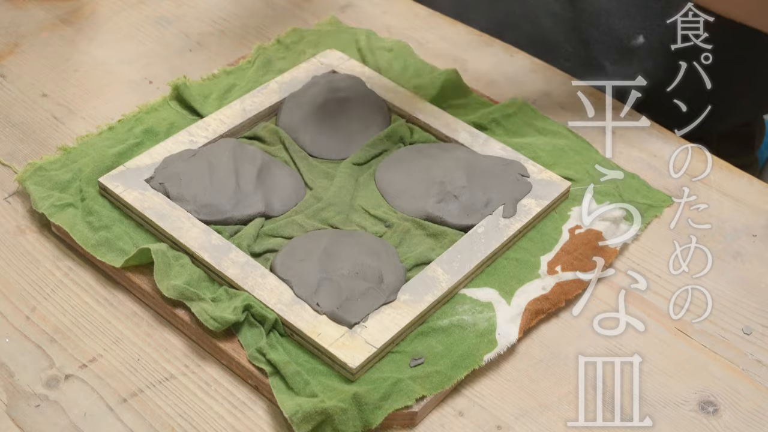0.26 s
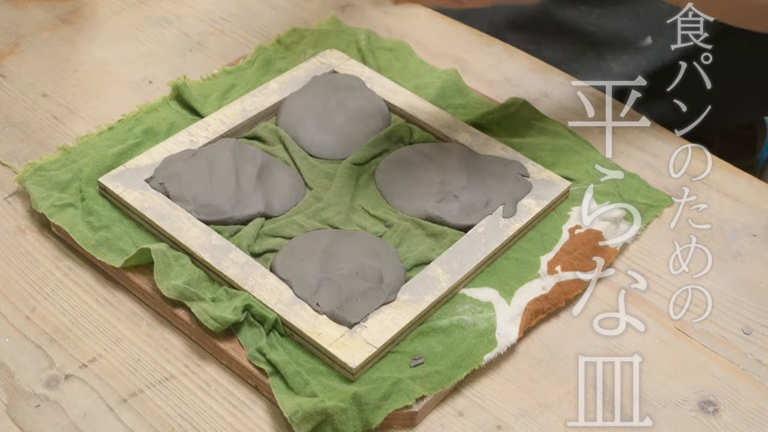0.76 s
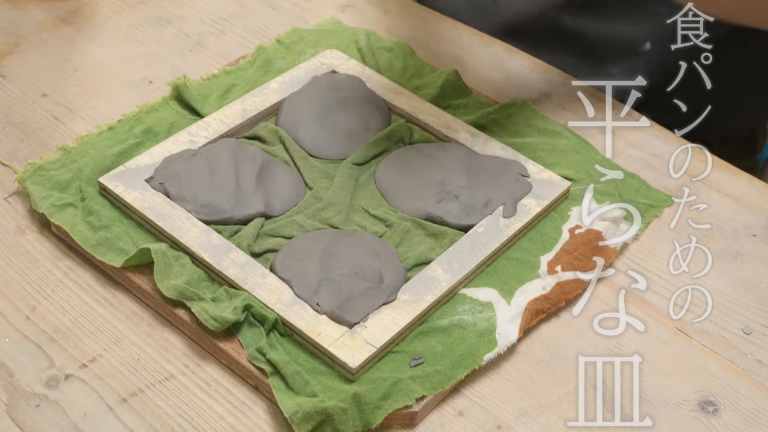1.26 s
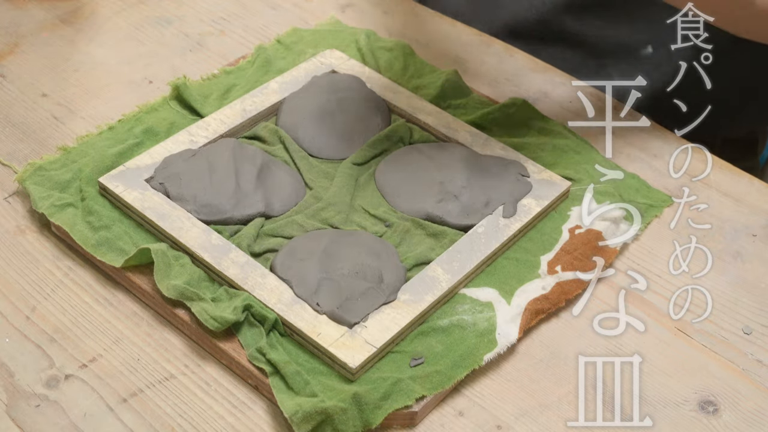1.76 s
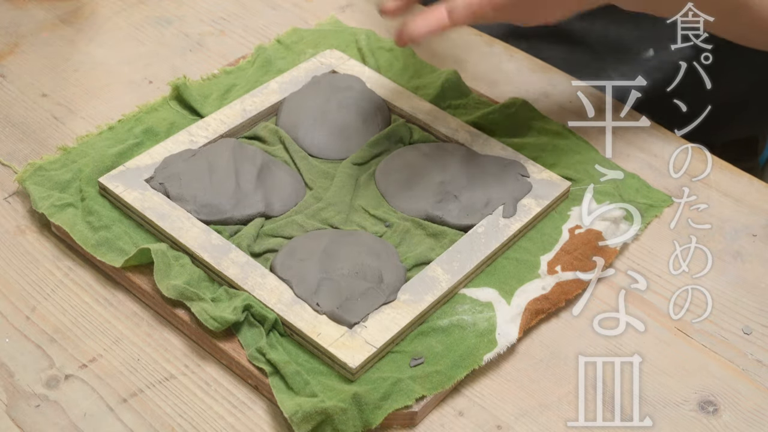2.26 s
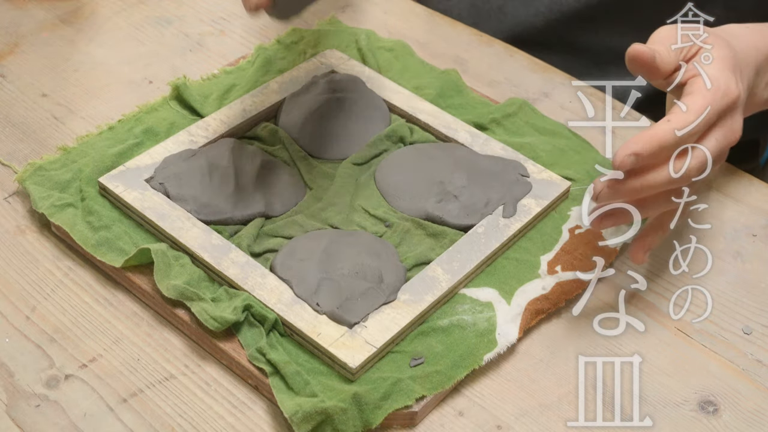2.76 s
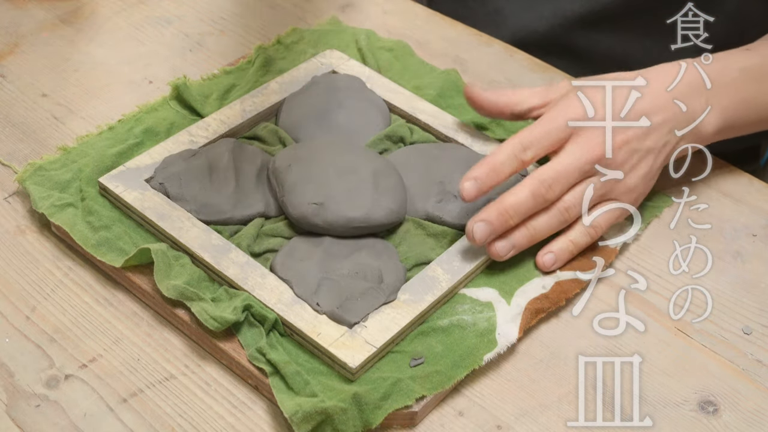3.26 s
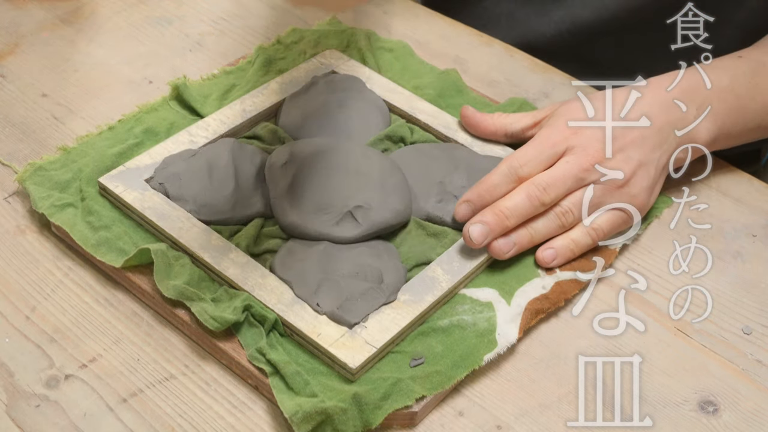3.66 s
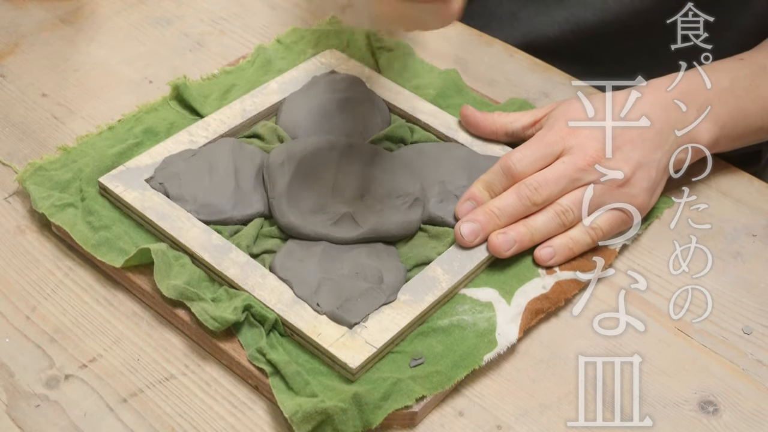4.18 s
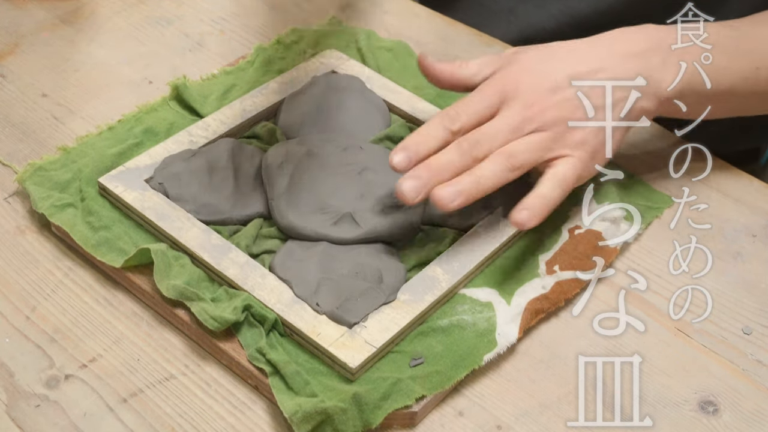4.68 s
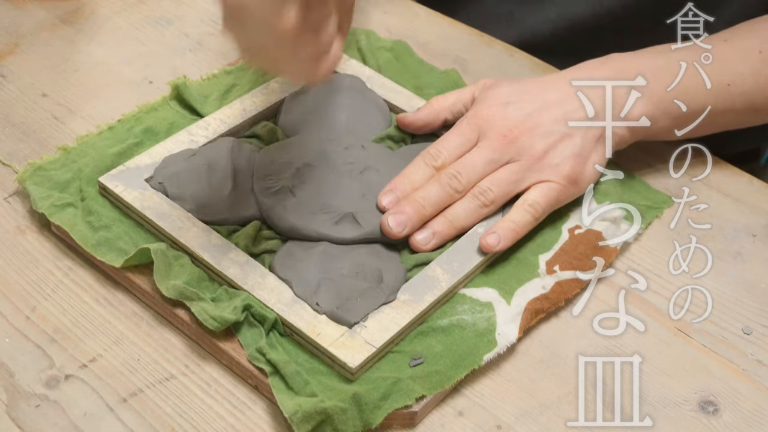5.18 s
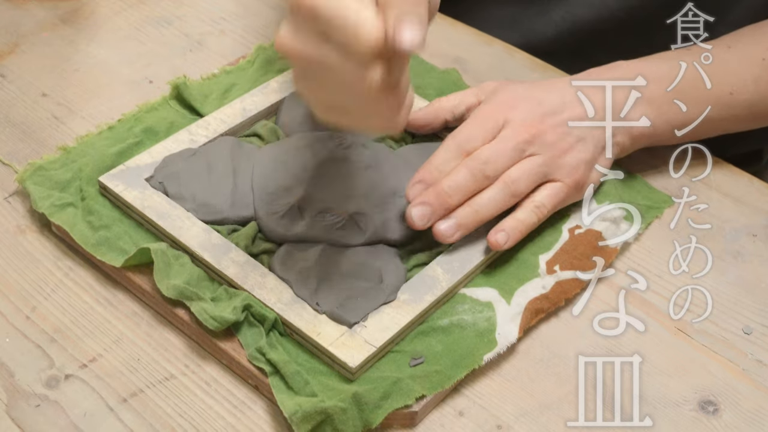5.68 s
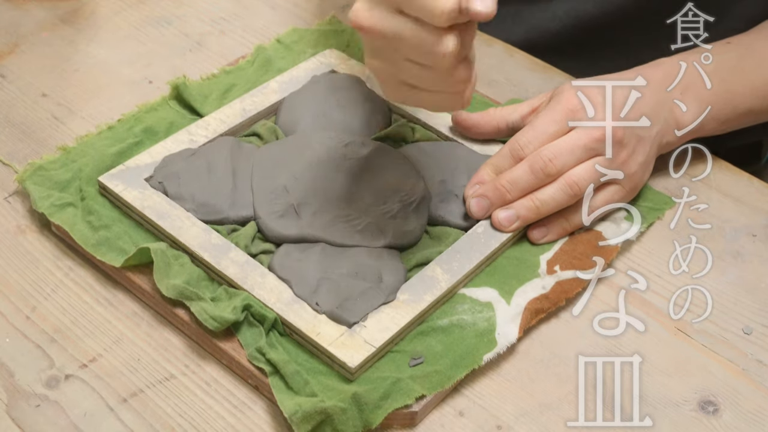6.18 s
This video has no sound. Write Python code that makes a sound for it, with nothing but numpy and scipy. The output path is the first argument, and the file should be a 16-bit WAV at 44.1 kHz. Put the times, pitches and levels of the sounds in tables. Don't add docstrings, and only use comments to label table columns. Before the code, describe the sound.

Crisp clay claps in a small dry workshop, a short pause, then low knocking fist blows making the table boom and loose tools tick.

```python
import sys
import numpy as np
from scipy import signal
from scipy.fft import rfft, irfft
from scipy.io import wavfile

SR = 44100
rng = np.random.default_rng(int(sys.argv[2]) if len(sys.argv) > 2 else 0)


def put_to_file(sound):
    columns = np.atleast_2d(sound).T
    safe = np.clip(columns, -1, 1)
    whole_steps = np.round(safe * 32767)
    wavfile.write(sys.argv[1], SR, whole_steps.astype(np.int16))


def gain_from_decibels(decibels):
    exponent = np.asarray(decibels, float) / 20
    return 10 ** exponent


N = 283563

# (frequency [Hz], level [dB per Hz])
BACKGROUND_SPECTRUM = [(15, -42), (25, -25), (102, 1), (180, -8), (223, -8), (335, -8), (439, -17.5),
                       (591, -21), (658, -22.5), (734, -17.5), (1130, -28.5), (5720, -35), (6550, -34),
                       (12500, -39), (16000, -37.5)]
# (time [s], peak level [dB], air pocket frequency [Hz], hiss level [dB], hiss frequency [Hz])
PALM_SLAPS = [(0.1051, -8.5, 1608, -9, 6800), (0.1097, -0.5, 1950, -21, 3100),
              (0.365, 10, 3363, -9.5, 7300), (0.596, 6, 2004, -4, 4336), (0.808, 0.5, 2070, -7, 6710),
              (0.8125, 5.4, 2168, -9.5, 7000), (1.0202, 13, 2322, -7, 6730), (1.2283, 9, 2150, -12.5, 6060),
              (1.4569, 12.5, 1683, -7, 5150), (1.6753, 12.5, 2400, -2, 6490), (1.9176, 21.5, 2300, 0, 5035),
              (2.1444, 12.5, 3300, 1, 8075)]
# (frequency [Hz], t60 [s])
ROOM_T60 = [(60, 0.12), (250, 0.14), (700, 0.14), (1800, 0.14), (5000, 0.15), (12000, 0.13)]
# (frequency [Hz], level [dB])
ROOM_LEVEL = [(60, -24), (230, -0.5), (420, -0.5), (760, 2.06), (1080, -5), (1800, -2.5), (4000, -2),
              (12000, -1)]
# (time [s], length [s], centre frequency [Hz], level [dB])
PEELS = [
    (0.213, 0.013, 8300, -47),
    (0.286, 0.025, 7500, -60.5),
    (0.327, .02, 7950, -49.5),
    (.67, 0.022, 9000, -51.5),
    (.75, 0.017, 9000, -55.5),
    (0.98, 0.034, 8000, -56),
    (1.198, 0.009, 8600, -48.5),
    (1.424, 0.023, 7000, -52),
]
# (time [s], peak level [dB], air pocket frequency [Hz], hiss level [dB], hiss frequency [Hz])
FIST_SMACKS = [(2.386, -28, 1780, 6, 6000), (2.3906, -26.5, 2440, -9.5, 5000), (2.9505, 3, 1840, -12, 4280),
               (3.4448, -8, 2400, -2.5, 4000), (3.7709, -16, 2380, -12, 4000),
               (4.0314, -25, 1660, -6, 4300), (4.2803, -10.5, 2094, -6.5, 6000),
               (4.4982, -6, 2250, -8.5, 3600), (4.8035, -34, 2210, -3, 3600), (4.81, -21, 2430, -24, 3600),
               (5.05, -20.5, 2400, 3.5, 4200), (5.3155, -8, 2220, -35.5, 3500),
               (5.5542, -14.5, 3000, -4, 10500), (5.7937, -21.5, 1900, -4.5, 3600),
               (6.0361, -20, 2056, 0, 3600), (6.2698, -22.5, 2000, -7, 3800)]
# (time [s], peak level [dB], ring frequency [Hz])
STRAY_TOUCHES = [
    (2.4299, -25.5, 2480),
    (2.8792, -49, 2226),
    (3.1538, -44, 2960),
    (3.3084, -37.5, 2490),
    (3.5917, -22, 5920),
    (4.7533, -32.5, 3560),
    (4.7586, -46, 5400),
    (4.769, -32, 3480),
    (4.7826, -42, 3540),
    (5.8362, -25.5, 2270),
]
# (delay [s], peak level [dB], ring frequency [Hz])
TOOL_LANDINGS = [
    (0.021, -36, 2420),
    (.047, -30, 1500),
    (.052, -21, 2130),
    (.06, -22, 1740),
    (.075, -27, 3600),
    (0.1104, -23.5, 4820),
]
# (frequency [Hz], level [dB], t60 [s])
LOOSE_MODES = [(1500, -1, .005), (2380, 0, .006), (3610, -1, .006), (4270, -3, .004), (5250, -3, .004),
               (5910, -4, .004), (6980, -7, .003), (9900, -14, .004)]
# (time [s], peak level [dB], table top share [dB], frame share [dB], tool hop level [dB])
BLOWS = [(2.951, -8, 12, -4, -27), (3.446, 4, 3.5, -13, 6), (3.771, 0.7, -28, -52, 0),
         (4.031, -1, -30, -29, -1.5), (4.283, -3, 4.5, -7, -6), (4.496, -1, 3.5, -7.5, -3),
         (4.754, -39.5, 20, -5, -50), (4.783, -49.5, 39, 15.5, -46), (4.808, -6.5, -2, -6, -34),
         (5.055, -1, 4.3, -12, -2.2), (5.313, -1, 3, -6.5, -3.5), (5.5578, -1.6, -10, -30, -2.7),
         (5.795, -1.9, -25, -40, -3.5), (6.036, 2.2, -4, -24.5, 4), (6.269, -2, -25, -25.5, -1.5)]
# (frequency [Hz], level [dB], t60 [s])
LEG_MODES = [(43.3, -10, 0.41), (57.8, -9, 0.077), (75.6, -8, 0.22), (86, -16.5, 0.075)]
TOP_MODES = [(139.2, -11, 0.019), (146.8, -6.5, 0.075), (165.9, -3, 0.19), (242.5, -5, 0.12),
             (270.3, -9, 0.11)]
FRAME_MODES = [(350, 8, 0.118), (386.6, 5.5, 0.088), (478, 16, 0.075), (561, 1.5, 0.069),
               (626, -8.5, 0.072), (679, 2, 0.076), (761, 24.5, 0.027), (837, 3, 0.19), (884, 1, 0.047),
               (933, 11, 0.11)]
# (time [s], peak level [dB])
BOARD_KNOCKS = [(3.4525, 5), (3.778, -14.5), (4.0379, -18), (4.2862, -3), (4.503, 5), (4.8116, -6.5),
                (5.0574, 4), (5.3209, 0), (5.5598, -5.5), (5.800, -22), (6.0395, -16), (6.275, -19.5)]


def unit_rms(x):
    return x / np.sqrt(np.mean(x ** 2) + 1e-20)


def at_hz(points, hz):
    table_hz, values = np.array(points).T
    return np.interp(np.log(hz), np.log(table_hz), values)


def band(x, low_hz, high_hz, order=2):
    edges = [low_hz, min(high_hz, 0.47 * SR)]
    return signal.sosfilt(signal.butter(order, edges, "band", fs=SR, output="sos"), x)


def low_pass(x, edge_hz, order):
    return signal.sosfilt(signal.butter(order, edge_hz, fs=SR, output="sos"), x)


def ring(force, hz, t60):
    radius = gain_from_decibels(-60 / (t60 * SR))
    angle = 2 * np.pi * hz / SR
    return signal.lfilter([0, np.sin(angle)], [1, -2 * radius * np.cos(angle), radius ** 2], force + 1e-18)


def add(out, s, piece):
    i = round(s * SR)
    out[i:i + len(piece)] += piece[:N - i]


def background():
    hz = np.maximum(np.fft.rfftfreq(N, 1 / SR), 1)
    spectrum = rfft(rng.standard_normal(N)) * gain_from_decibels(at_hz(BACKGROUND_SPECTRUM, hz))
    noise = gain_from_decibels(-46) * unit_rms(irfft(spectrum, N))
    waver_db = np.interp(np.arange(N), np.linspace(0, N, 60), rng.normal(0, 1.5, 60))
    swell = np.interp(np.arange(N), np.linspace(0, N, 30), rng.standard_normal(30))
    rumble_db = -57 + 5.5 * swell
    low = low_pass(noise, 1000, order=1)
    lowest = low_pass(noise, 200, order=1)
    hiss = noise - low
    hum = gain_from_decibels(waver_db) * (low - lowest)
    return hiss + hum + gain_from_decibels(rumble_db) * unit_rms(low_pass(lowest, 170, order=2))


def cracks(rows, drive_db, contact_s, width, ragged):
    close, pop = np.zeros(N), np.zeros(N)
    t = np.arange(900) / SR
    squirt = np.minimum(t / 0.00044, 1) * np.exp(-(t / contact_s) ** 2)
    click = 1. * (t == 0)
    noises = rng.standard_normal((len(rows), 2, 900))
    for (s, peak_db, pocket_hz, hiss_db, hiss_hz, thud_db), noise in zip(rows, noises):
        thud = -gain_from_decibels(thud_db) * unit_rms(band(squirt, 360, 2900, order=1))
        burst = ragged * noise * squirt / np.linalg.norm(squirt) + (1 - ragged) * click
        for out, (low, high) in ((close, burst), (pop, (click, click))):
            pocket = unit_rms(band(low, pocket_hz / width, pocket_hz * width, order=1))
            hiss = unit_rms(band(high, hiss_hz / 2.26, hiss_hz * 1.442, order=3))
            add(out, s, gain_from_decibels(peak_db + drive_db) * (pocket + gain_from_decibels(hiss_db) * hiss + thud))
    return close, pop


def palm_slaps():
    thud_follows = 0.15
    rows = [row + (-(1 - thud_follows) * row[1],) for row in PALM_SLAPS]
    return cracks(rows, drive_db=-17, contact_s=0.0024, width=1.275, ragged=0.9)


def workshop(x):
    t = np.arange(SR // 2) / SR
    edges = 40 * 2 ** np.arange(0, 9, 0.5)
    white = rng.standard_normal((2, len(t)))
    rise = np.clip((t - 0.003) / 0.0029, 0, 1)
    echo = np.zeros(len(t))
    for k, (low, high) in enumerate(zip(edges, edges[1:])):
        hz = np.sqrt(low * high)
        decay = rise * gain_from_decibels(-60 * t / at_hz(ROOM_T60, hz))
        decay_norm = np.sqrt(np.sum(decay ** 2))
        echo += gain_from_decibels(at_hz(ROOM_LEVEL, hz)) * band(white[k % 2], low, high) * decay / decay_norm
    return signal.fftconvolve(x, echo)[:N]


def peels():
    out = np.zeros(N)
    for (s, length, hz, db), noise in zip(PEELS, rng.standard_normal((len(PEELS), 3000))):
        progress = np.minimum(np.arange(3000) / (length * SR), 1)
        shape = np.sqrt(np.sin(np.pi * progress).clip(0))
        add(out, s, gain_from_decibels(db) * shape * unit_rms(band(noise, hz / 1.35, hz * 1.5, order=1)))
    return out


def fist_smacks():
    rows = [row + (-1.4,) for row in FIST_SMACKS]
    return cracks(rows, drive_db=-12.5, contact_s=0.0041, width=1.14, ragged=0.69)


def tool_landings():
    scatter_s, scatter_db = 0.0015, 2.5
    chance = rng.standard_normal((len(BLOWS), len(TOOL_LANDINGS), 2))
    landings = []
    for (blow_s, _, _, _, hop_db), draws in zip(BLOWS, chance):
        for (delay, db, hz), (late, hard) in zip(TOOL_LANDINGS, draws):
            landings.append((blow_s + delay + scatter_s * late, db + hop_db + scatter_db * hard, hz))
    return landings


def rattle():
    buzz_peak_s, contacts_per_s = 0.064, 5000
    ticks, shake = np.zeros(N), np.zeros(N)
    t = np.arange(12000) / SR
    touches = STRAY_TOUCHES + tool_landings()
    for (s, peak_db, ring_hz), noise in zip(touches, rng.standard_normal((len(touches), 500))):
        snap = noise * np.exp(-t[:500] / 0.0009)
        tick = band(snap, ring_hz, ring_hz * 1.15, order=1)
        tick += gain_from_decibels(-24) * band(snap, 4500, 10500, order=1)
        add(ticks, s, gain_from_decibels(peak_db - 5) * tick / np.abs(tick).max())
        add(shake, s, gain_from_decibels(peak_db + 31) * np.exp(-t / 0.0066))
    swell = (t / buzz_peak_s * np.exp(1 - t / buzz_peak_s)) ** 1.7
    for row in BLOWS[1:]:
        add(shake, row[0], gain_from_decibels(0.5 * row[1]) * swell)
    sizes = gain_from_decibels(3 * np.minimum(rng.exponential(1, N), 4)) * rng.choice([-1, 1], N)
    contacts = shake * sizes * (rng.random(N) < contacts_per_s / SR)
    struck = rng.integers(0, len(LOOSE_MODES), N)
    buzz = gain_from_decibels(0.5) * band(contacts, 630, 5400, order=1)
    for k, (hz, db, t60) in enumerate(LOOSE_MODES):
        buzz += gain_from_decibels(db) * ring(contacts * (struck == k), hz, t60)
    return ticks + gain_from_decibels(-46) * buzz


def table():
    push_s, board_lag_s, legs_db = 0.0008, 0.0029, -2
    out = np.zeros(N)
    t = np.arange(SR // 2) / SR
    push = np.exp(-t / push_s)
    parts = ((LEG_MODES, 3, 1), (TOP_MODES, 1.5, -1), (FRAME_MODES, -1.5, -1))
    chances = rng.standard_normal((len(BLOWS), 2, 3, 10))
    noises = rng.standard_normal((len(BLOWS), 3, len(t)))
    for (s, peak_db, top_db, frame_db, _), (uneven, detune), noise in zip(BLOWS, chances, noises):
        force = push / push.sum() + gain_from_decibels(-35) * noise[0] * np.exp(-t / 0.008)
        blur_gain = gain_from_decibels(legs_db - 25.5) + gain_from_decibels(frame_db - 23)
        body = blur_gain * unit_rms(band(noise[1], 260, 1300)) * np.exp(-t / 0.086)
        body += gain_from_decibels(legs_db - 13) * unit_rms(band(noise[2], 40, 390)) * np.exp(-t / 0.079)
        body *= np.minimum(t / 0.005, 1)
        for part, (modes, part_db, sign) in enumerate(parts):
            lag = round(board_lag_s * SR) if part == 2 else 0
            share_db = (legs_db, top_db, frame_db)[part]
            for k, (hz, level_db, t60) in enumerate(modes):
                gain = sign ** k * gain_from_decibels(share_db + level_db + part_db + uneven[part, k])
                tone = ring(force, hz * (1 + 0.011 * detune[part, k]), t60)
                body[lag:] += gain * tone[:len(t) - lag]
        add(out, s, gain_from_decibels(peak_db - 4) * body)
    return low_pass(out, 1050, order=4)


def board_knocks():
    rows = [row + (1530, -44, 3800, 3.5) for row in BOARD_KNOCKS]
    return cracks(rows, drive_db=-21.5, contact_s=0.0006, width=1.1, ragged=0.083)


def scene():
    slaps, slap_pops = palm_slaps()
    smacks, smack_pops = fist_smacks()
    knocks, knock_pops = board_knocks()
    thuds = table()
    small = rattle() + peels()
    to_walls = slap_pops + gain_from_decibels(-8) * smack_pops + gain_from_decibels(-11) * knock_pops + gain_from_decibels(-8) * thuds + gain_from_decibels(-5) * small
    air = slaps + smacks + knocks + thuds + small + workshop(to_walls)
    air = signal.sosfilt(signal.butter(3, 48, "high", fs=SR, output="sos"), air)
    return (air + background())[None]


def top_cut(x):
    return signal.sosfilt(signal.butter(12, 16140, fs=SR, output="sos"), x)


def record(dry):
    limit_db, ceiling_db, attack_s, release_db_per_s = -16, 2, 0.0022, 519
    heard = signal.lfilter(*signal.butter(1, 600, "high", fs=SR), dry[0])
    power = signal.lfilter([0.008], [1, -0.992], heard ** 2)
    level_db = np.minimum(10 * np.log10(power + 1e-12), ceiling_db)
    ramp = release_db_per_s * np.arange(N) / SR
    held_db = np.maximum.accumulate(level_db + ramp) - ramp
    over_db = np.maximum(held_db - limit_db, 0)
    r = np.exp(-1 / (attack_s * SR))
    duck_db = signal.lfilter([1 - r], [1, -r], over_db)
    mix = np.clip(dry * gain_from_decibels(-duck_db), -1, 1)
    return top_cut(mix)


dry = scene()
out = record(dry)
put_to_file(out)
```